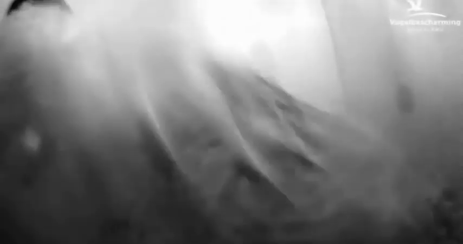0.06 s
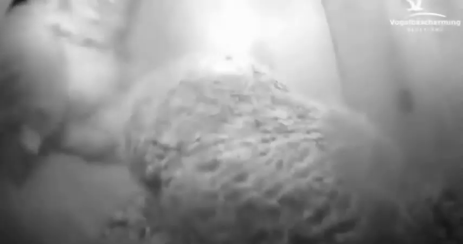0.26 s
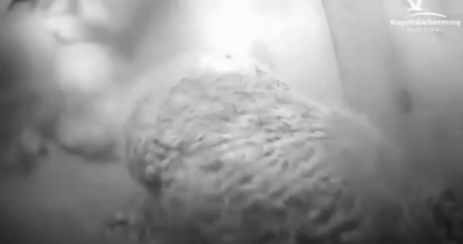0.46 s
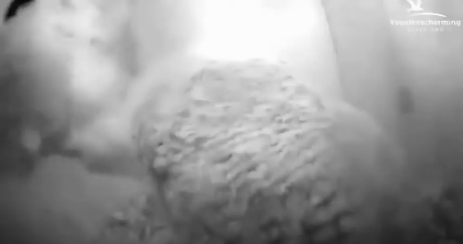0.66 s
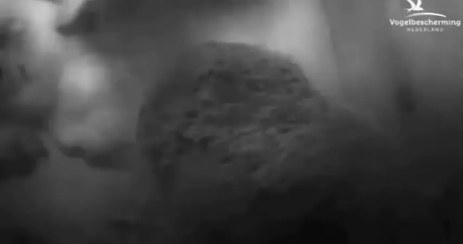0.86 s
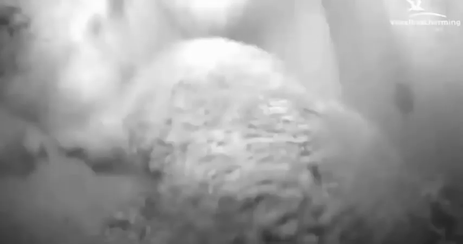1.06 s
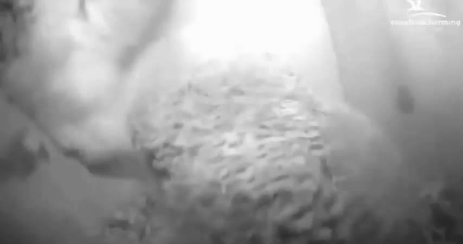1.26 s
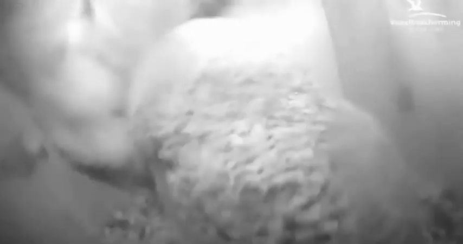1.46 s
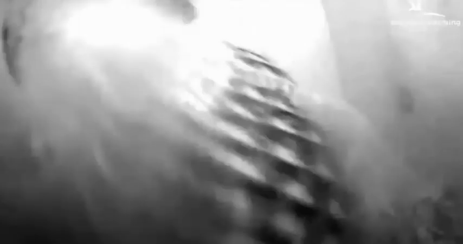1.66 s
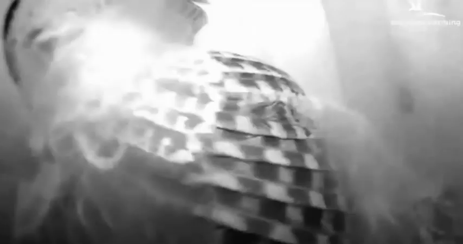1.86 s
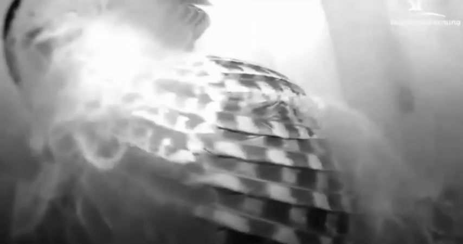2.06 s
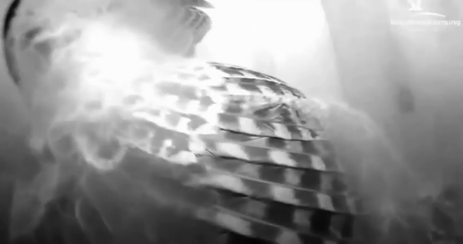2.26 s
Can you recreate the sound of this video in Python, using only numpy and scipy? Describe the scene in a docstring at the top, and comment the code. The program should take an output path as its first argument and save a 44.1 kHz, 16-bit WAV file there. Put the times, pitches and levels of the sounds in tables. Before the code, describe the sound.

A large bird bumps twice against a wooden nest box, with feather rustles and claw scratches.

```python
"""Inside a wooden nest box, a large bird shifts about close to a small dull microphone.
It bumps hard against the box twice, overloading the input, with softer knocks around; each bump
pushes the air and rings the wood. Tiny friction slips make its body rub, the box rock and its
feathers rustle. Its claws tick in the litter, and claws and quills squeak as they skid on the wood.
Faint hiss and mains hum lie beneath."""
import sys
import numpy as np
from scipy import signal
from scipy.fft import rfft, irfft
from scipy.io import wavfile
from scipy.ndimage import uniform_filter1d

SR = 44100
rng = np.random.default_rng(int(sys.argv[2]) if len(sys.argv) > 2 else 0)


def bounce(signal):
    """Save signal as a 16-bit WAV file at the path given by the first command-line argument."""
    frames = np.transpose(np.atleast_2d(signal))
    limited = np.clip(frames, -1, 1)
    pcm = np.round(limited * 32767).astype(np.int16)
    wavfile.write(sys.argv[1], SR, pcm)


N = 101429
TIME = np.arange(N) / SR
DECAYS_PER_T60 = np.log(1000)  # time constants in a fall of 60 dB


def from_db(db):
    """Decibels to gain."""
    return 10 ** (np.asarray(db) / 20)


def unit_rms(x):
    """Scale to unit rms."""
    return x / np.sqrt(np.mean(x ** 2) + 1e-20)


def fader_curves(stretches):
    """Join stretches of timed dB points into one gain curve per level column."""
    times, *columns = np.vstack(stretches).T
    return [from_db(np.interp(TIME, times, db)) for db in columns]


def coloured(x, spectrum):
    """Shape x with an EQ curve, at unit rms."""
    hz, db = np.transpose(spectrum)
    bin_hz = np.maximum(np.arange(N // 2 + 1) * SR / N, 1)
    gain = from_db(np.interp(np.log(bin_hz), np.log(hz), db))
    return unit_rms(irfft(rfft(x) * gain, N))


def burst(peak_s, swell_s, decay_s):
    """Envelope that swells up to its peak and dies away after it."""
    t = TIME - peak_s
    return np.exp(-np.minimum(np.where(t < 0, -t / swell_s, t / decay_s), 60))


def friction(spectrum, slips_per_s, spread_db, even_s):
    """Tiny random slips sound through a body, their strength evened out over even_s."""
    sizes = from_db(spread_db * np.minimum(rng.exponential(1, N), 4)) * rng.choice([-1, 1], N)
    slips = sizes * (rng.random(N) < slips_per_s / SR)
    texture = coloured(slips, spectrum)
    power = uniform_filter1d(texture ** 2, int(even_s * SR))
    return texture / np.sqrt(np.abs(power) + 1e-3)


# Tone of the microphone's hiss and the input stage's. Each row: frequency in Hz, relative level in dB.
MIC_HISS_EQ = [(20, 14), (65, 7), (105, 5), (250, 0.5), (400, 6.5), (700, 2.5), (1100, 0.5), (1600, -3.5),
               (2050, -5.5), (2800, -1), (3550, 1), (4000, -5), (4500, -17)]
INPUT_HISS_EQ = [(1000, -29.5), (1800, -1.5), (2200, 1.5), (3500, -31.5), (6000, -60.5)]
def hiss(spectrum, level_db):
    """A steady bed of shaped electronic noise."""
    return from_db(level_db) * coloured(rng.standard_normal(N), spectrum)


# Mains harmonics. Each row: frequency in Hz, rms level in dB.
HUM_LINES = [(49.6, -62.5), (99, -89.5), (149.3, -76), (249, -87)]
def hum():
    """The mains leaves a low, steady drone."""
    return sum(np.sqrt(2) * from_db(db) * np.sin(2 * np.pi * (hz * TIME + rng.random()))
               for hz, db in HUM_LINES)


# Skids on the wood. Each row: centre in seconds, level in dB, half length in seconds, pitch in Hz.
SKIDS = [(0.238, -45, 0.0035, 3560), (1.612, -75.5, 0.02, 1210), (1.672, -69.5, 0.016, 1210),
         (2.178, -74, 0.008, 1570), (2.16, -80, 0.08, 3580)]
def squeaks(waver_hz=44.3, waver_s=0.0057):
    """A skidding claw or quill sings briefly on an unsteady pitch."""
    out = 0
    for centre_s, db, half_s, hz in SKIDS:
        waver = unit_rms(uniform_filter1d(rng.standard_normal(N), int(waver_s * SR)))
        phase = 2 * np.pi * np.cumsum(hz + waver_hz * waver) / SR
        swell = np.exp(-((TIME - centre_s) / half_s) ** 2)
        out = out + np.sqrt(2) * from_db(db) * np.sin(phase) * swell
    return out


# Rustle faders, in stretches. Each row: time in seconds, relative swish and crackle levels in dB.
RUSTLE_FADERS = [
    [(0.0, -56.5, -68.5), (0.02, -64.5, -73.5), (0.046, -70, -69), (0.07, -91, -100), (0.136, -79, -87),
     (0.182, -63, -64), (0.192, -77, -79.5), (0.204, -43, -55)],
    [(0.232, -37.5, -60), (0.252, -65, -77), (0.274, -69, -66), (0.3, -78, -90), (0.335, -73, -61.5),
     (0.364, -85, -101), (0.416, -58.5, -70.5), (0.514, -101, -93), (0.64, -73, -110)],
    [(0.66, -87, -92), (0.678, -56, -78.5), (0.696, -69.5, -95), (0.72, -46.5, -61.5),
     (0.738, -53.5, -61.5), (0.76, -38.5, -50), (0.778, -55.5, -57.5), (0.788, -55.5, -54.5)],
    [(0.825, -41, -48.5), (0.842, -46.5, -64.5), (0.86, -54, -66.5), (0.884, -51.5, -67), (0.915, -76, -77),
     (0.929, -52.5, -60), (0.951, -65.5, -71.5), (1.013, -57, -70.5), (1.12, -95.5, -94.5)],
    [(1.2, -95.5, -90), (1.252, -84, -84), (1.262, -68, -76.5), (1.28, -78.5, -83), (1.496, -95.5, -89),
     (1.53, -60, -79), (1.558, -82, -94), (1.672, -61, -72.5), (1.696, -75, -93), (1.75, -77.5, -88)],
    [(1.8, -80, -83), (1.848, -100, -90.5), (1.874, -72, -79), (1.958, -94, -89.5), (2.17, -75.5, -79),
     (2.3, -92, -84.5)],
]
# Tone of the midrange swish and the treble crackle. Each row: frequency in Hz, relative level in dB.
SWISH_EQ = [(300, -24), (520, 2.5), (800, 0.5), (1000, -1), (1200, -4.5), (1420, -11.5), (1600, -7.5),
            (1950, -16.5), (2600, -35)]
CRACKLE_EQ = [(1700, -28), (2100, -9), (2500, -4), (3000, 0), (3500, -0.5), (3900, -6.5), (4400, -16.5)]
def feathers(swish_db=-4, crackle_db=2):
    """Feathers brush the wall with a soft swish and a finer crackle."""
    swish_gain, crackle_gain = fader_curves(RUSTLE_FADERS)
    swish = friction(SWISH_EQ, slips_per_s=1600, spread_db=3.3, even_s=0.026)
    crackle = friction(CRACKLE_EQ, slips_per_s=1900, spread_db=3.5, even_s=0.091)
    return from_db(swish_db) * swish_gain * swish + from_db(crackle_db) * crackle_gain * crackle


# Fader for the rocking box, in stretches. Each row: time in seconds, relative level in dB.
ROCKING_FADER = [
    [(0.0, -41.5), (0.022, -43), (0.038, -57), (0.084, -50.5), (0.132, -62), (0.176, -45.5), (0.185, -45)],
    [(0.245, -31.5), (0.257, -33), (0.349, -37), (0.39, -42.5)],
    [(0.49, -53), (0.586, -48.5), (0.604, -50), (0.644, -40.5), (0.708, -54), (0.72, -45.5), (0.77, -32)],
    [(0.845, -44), (0.865, -44.5), (0.955, -51), (0.979, -83), (0.999, -54.5), (1.069, -50.5),
     (1.08, -59.5)],
]
# Tone of its rumble. Each row: frequency in Hz, relative level in dB.
ROCKING_EQ = [(12, -3.5), (30, -1.5), (60, 2), (95, -7.5), (140, -18), (260, -55)]
def box_rocking(trim_db=-1.5, settle_at_s=1.013, fade_s=0.12):
    """The box rocks under the bird's weight, rumbling until the bird settles."""
    gain, = fader_curves(ROCKING_FADER)
    settling = np.exp(-np.maximum(TIME - settle_at_s, 0) / fade_s)
    rumble = friction(ROCKING_EQ, slips_per_s=260, spread_db=2.5, even_s=0.03)
    return from_db(trim_db) * gain * settling * rumble


# Fader for the rubbing body, in stretches. Each row: time in seconds, relative level in dB.
RUB_FADER = [
    [(0.0, -56), (0.042, -67.5), (0.074, -70.5), (0.12, -97), (0.142, -75), (0.16, -53), (0.176, -101),
     (0.19, -52)],
    [(0.236, -21.5), (0.252, -34.5), (0.27, -27), (0.288, -41), (0.36, -40.5), (0.395, -46), (0.43, -65.5),
     (0.66, -71)],
    [(0.67, -55.5), (0.728, -50.5), (0.738, -61), (0.748, -52), (0.76, -30), (0.776, -42.5), (0.79, -27.5)],
    [(0.832, -32), (0.856, -31), (0.868, -43), (0.916, -62), (0.95, -49), (1.042, -58), (1.11, -84),
     (1.12, -92)],
    [(1.25, -73.5), (1.294, -90.5), (1.34, -62.5), (1.414, -82.5), (1.51, -72)],
    [(1.54, -53.5), (1.58, -65), (1.634, -58.5), (1.646, -68), (1.666, -53), (1.71, -77), (1.75, -82)],
]
# Tone of the rub. Each row: frequency in Hz, relative level in dB.
RUB_EQ = [(80, -14), (135, 5), (220, 3), (330, -3.5), (440, -6.5), (560, -17.5), (750, -30), (1100, -45.5),
          (2000, -68.5)]
def body_rub(trim_db=-2):
    """The body drags along the wood with a low, grainy scuff."""
    gain, = fader_curves(RUB_FADER)
    return from_db(trim_db) * gain * friction(RUB_EQ, slips_per_s=640, spread_db=2, even_s=0.0065)


# Claw and quill catches. Each row: peak in seconds, scrape in dB, its decay in seconds, tick in dB.
CATCHES = [(.2122, -33.5, 0.0021, -17), (.232, -40, .002, -45), (0.679, -71.5, 0.003, -71.5),
           (.7945, -47.5, 0.001, -50), (0.7991, -26, 0.00097, -40), (.803, -34.5, 0.0015, -44.5),
           (0.8122, -36.5, .001, -51), (.848, -41.5, 0.00056, -49.5), (0.9289, -49.5, 0.00075, -62),
           (0.984, -56, .002, -67), (1.266, -69.5, 0.0041, -76), (1.3185, -67, .002, -75.5),
           (1.3331, -57.5, 0.0012, -64.5), (1.389, -64, .0012, -67.5), (1.5257, -72, 0.0039, -63.5)]
# Tone of the scrape. Each row: frequency in Hz, relative level in dB.
SCRAPE_EQ = [(500, -9.5), (1100, -5), (1650, -9.5), (2050, -15), (2450, -2.5), (2850, -1), (3120, -4),
             (3520, 3.5), (3900, -8.5), (4500, -15.5)]
# Modes rung by a catch. Each row: pitch in Hz, level relative to the tick in dB, t60 in seconds.
TICK_MODES = [(1690, -12.5, 0.012), (2430, -10, .01), (2800, -4.5, 0.011), (3474, -0.5, 0.011),
              (3910, -14, .009)]
def scratches(scrape_swell_s=0.0014, tick_swell_s=0.00074):
    """Claws and quills catch with a short bright burst of slips and ring a hollow tick."""
    force = ticks = 0
    for peak_s, scrape_db, decay_s, tick_db in CATCHES:
        force = force + from_db(scrape_db) * burst(peak_s, scrape_swell_s, decay_s)
        for k, (hz, mode_db, t60) in enumerate(TICK_MODES):
            tone = (-1) ** k * np.cos(2 * np.pi * hz * (TIME - peak_s))  # modes alternate in polarity
            envelope = burst(peak_s, tick_swell_s, t60 / DECAYS_PER_T60)
            ticks = ticks + from_db(tick_db + mode_db) * tone * envelope
    return ticks + force * friction(SCRAPE_EQ, slips_per_s=6300, spread_db=0, even_s=0.00071)


# Hits on the box. Each row: time in seconds, air push gain in dB, push length in seconds,
# softness in seconds, ring level in dB, ring pitch in Hz, ring t60 in seconds.
BOX_HITS = [(0.2133, -4, 0.0029, 0.0027, -4.5, 675, 0.012), (0.225, -20.5, 0.0025, .0015, -16, 284, 0.018),
            (0.2655, -46, .002, .002, -26, 190, .06), (0.3056, -32.5, 0.0018, .0015, -32, 169, .035),
            (0.3228, -28, 0.0017, 0.0012, -33, 130, .05), (0.3775, -41, 0.003, 0.002, -37, 385, 0.035),
            (0.411, -42.5, 0.0018, .001, -40.5, 306.2, .05), (0.4156, -34.5, 0.0093, 0.004, -27, 60.7, 0.2),
            (0.678, -56.5, .002, 0.00074, -46.5, 447, 0.044), (0.7603, -30, 0.0015, 0.0007, -30, 400, 0.03),
            (0.7962, -31, 0.0018, 0.00048, -24.5, 713, .006),
            (0.7993, -30, .002, 0.00068, -19.5, 1186, 0.0027),
            (0.8124, -1.5, 0.0013, 0.00036, -23.5, 400, 0.0065),
            (0.824, -47.5, 0.0022, 0.0011, -21.5, 418, 0.03),
            (0.9565, -38, 0.0027, 0.00085, -40.5, 170.6, .05),
            (1.338, -51.5, 0.003, 0.0014, -58.5, 365, 0.06),
            (1.5297, -52, 0.0023, 0.0014, -39.5, 320, .022), (1.5397, -41, .003, .0015, -52, 230, .05)]
def bumps(ring_lead_s=0.0011, ring_swell_s=0.0011):
    """Each bump swings the air from suction to pressure and sets the wood ringing briefly."""
    upper_ratio, upper_db, upper_t60_s = 1.358, -8, 0.0083  # a higher, quickly damped mode of the wood
    out = 0
    for hit_s, push_db, length_s, soft_s, ring_db, ring_hz, ring_t60 in BOX_HITS:
        swing = np.tanh((TIME - hit_s) / soft_s)
        out = out + from_db(push_db) * swing * burst(hit_s, length_s, length_s)
        touch_s = hit_s - ring_lead_s
        modes = (ring_hz, ring_db, ring_t60), (ring_hz * upper_ratio, ring_db + upper_db, upper_t60_s)
        for hz, db, t60 in modes:
            tone = np.sin(2 * np.pi * hz * (TIME - touch_s))
            out = out + from_db(db) * tone * burst(touch_s, ring_swell_s, t60 / DECAYS_PER_T60)
    return out


def scene():
    """The bird's movements and the hum, mixed to mono."""
    return (bumps() + scratches() + squeaks() + body_rub() + box_rocking() + feathers() + hum())[None]


def record(dry):
    """A dull microphone feeds an input that flattens the peaks, scoops the mids and adds faint noise."""
    mic_edge_hz, top_edge_hz = 4060, 16400
    ceiling, knee_hardness = 0.455, 74
    notch_hz, notch_width_hz = 2026, 650
    mic_lowpass = signal.butter(9, mic_edge_hz, fs=SR, output="sos")
    dull = signal.sosfiltfilt(mic_lowpass, dry + hiss(MIC_HISS_EQ, level_db=-75.5))
    clipped = dull / (1 + np.abs(dull / ceiling) ** knee_hardness) ** (1 / knee_hardness)
    scooped = signal.lfilter(*signal.iirnotch(notch_hz, notch_hz / notch_width_hz, fs=SR), clipped)
    white_floor = from_db(-99) * rng.standard_normal(N)
    noisy = scooped + white_floor + hiss(INPUT_HISS_EQ, level_db=-91)
    return signal.sosfilt(signal.cheby2(12, 60, top_edge_hz, fs=SR, output="sos"), noisy)


dry = scene()
out = record(dry)
bounce(out)
```